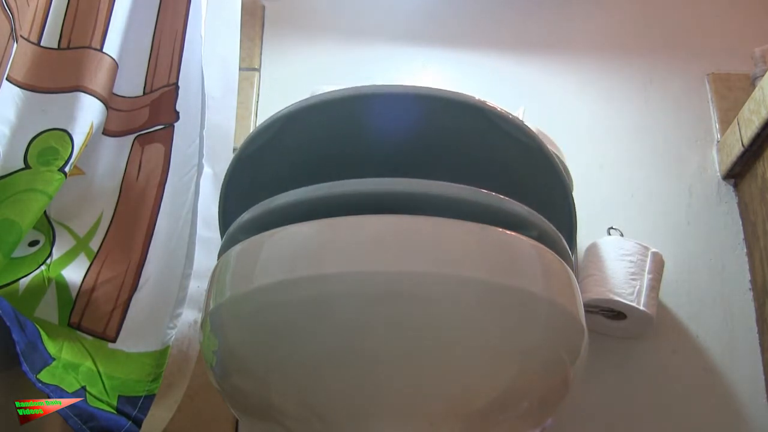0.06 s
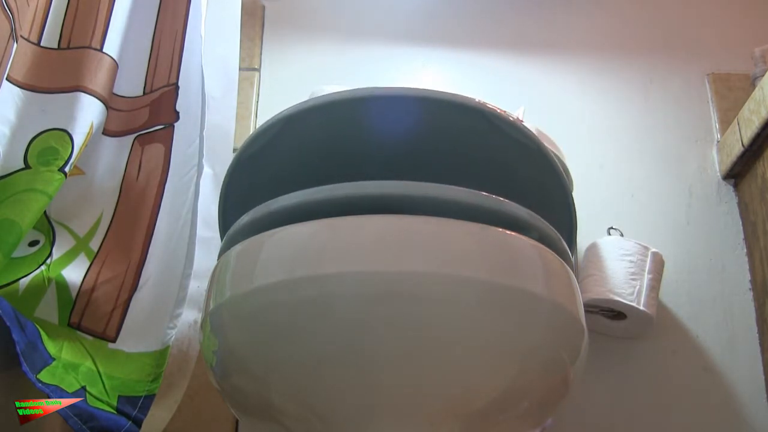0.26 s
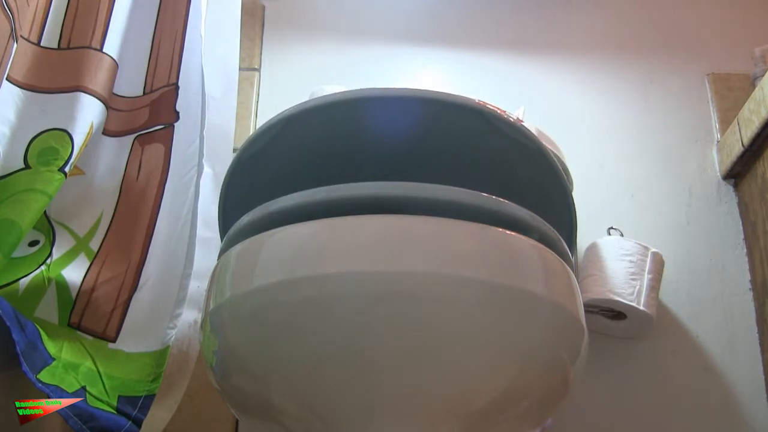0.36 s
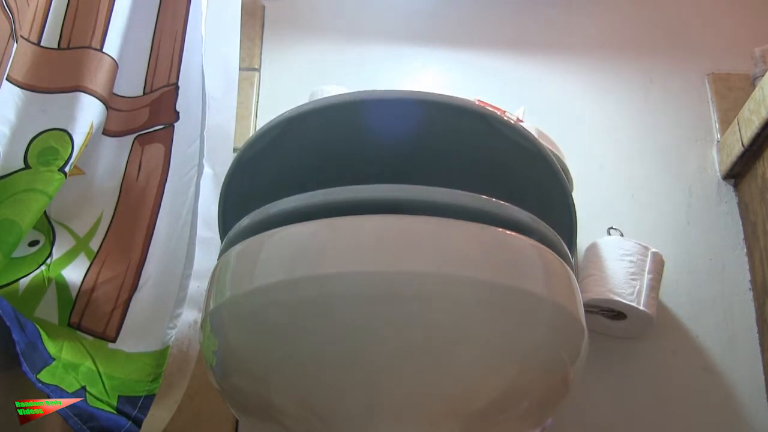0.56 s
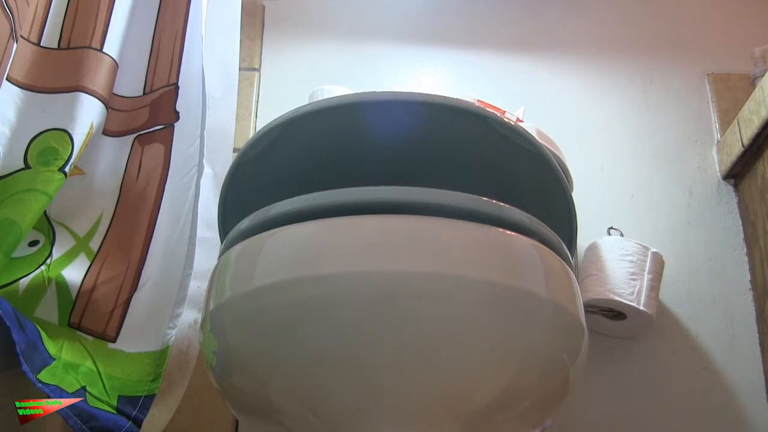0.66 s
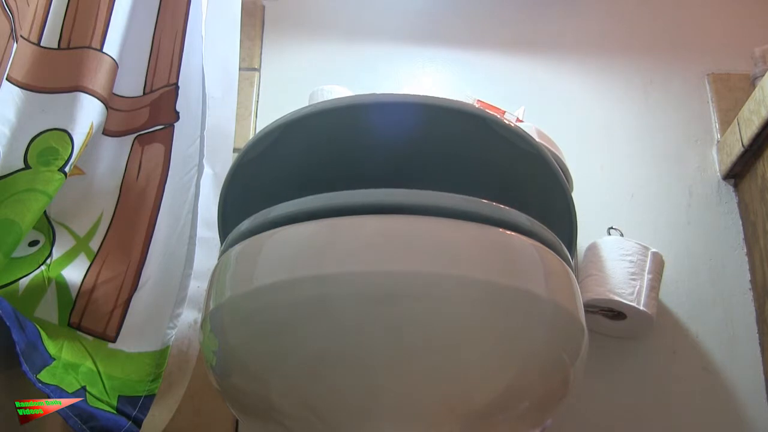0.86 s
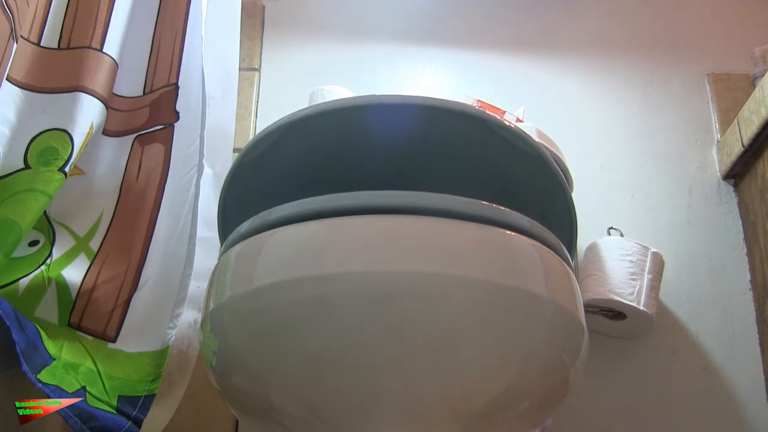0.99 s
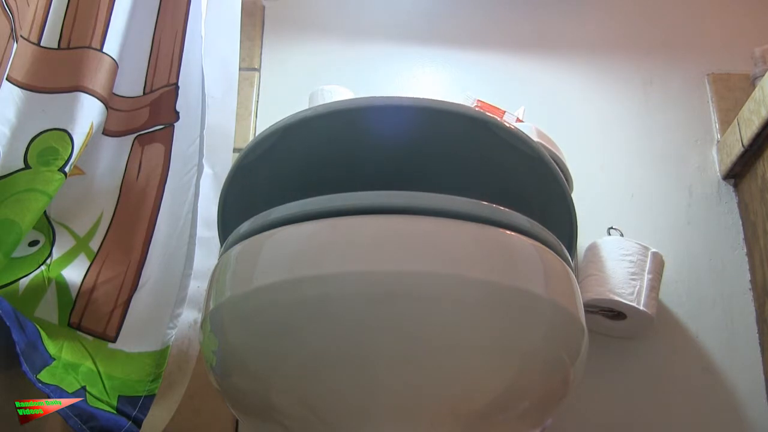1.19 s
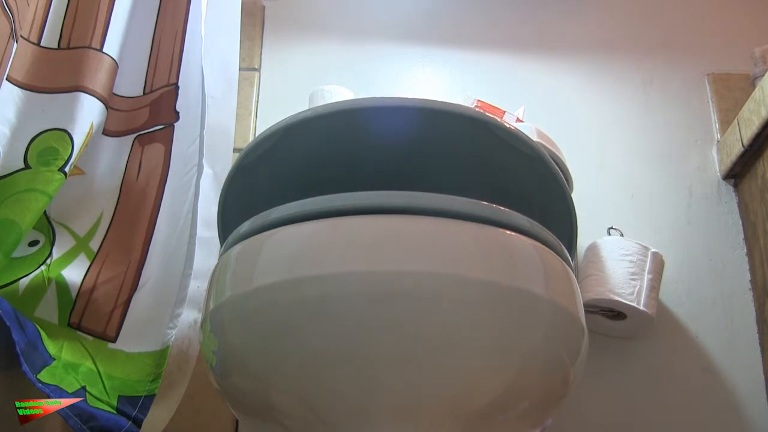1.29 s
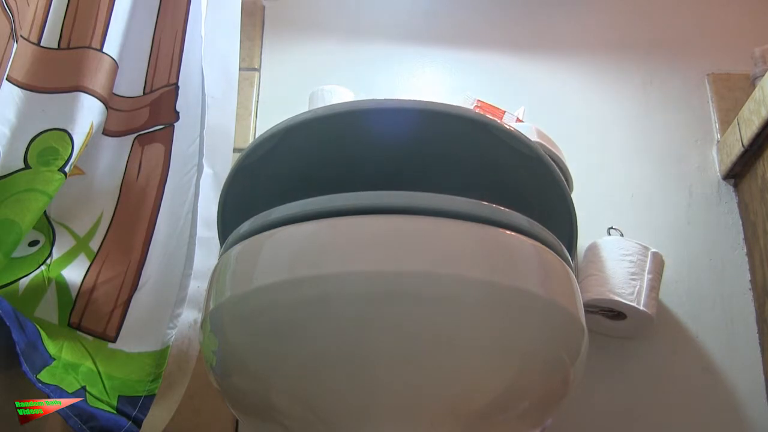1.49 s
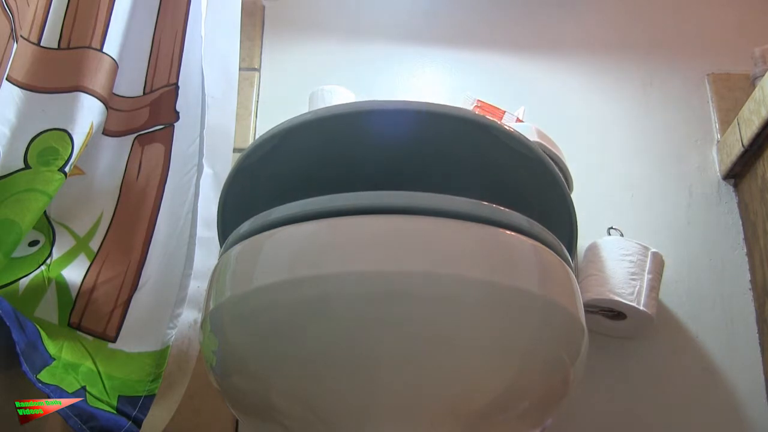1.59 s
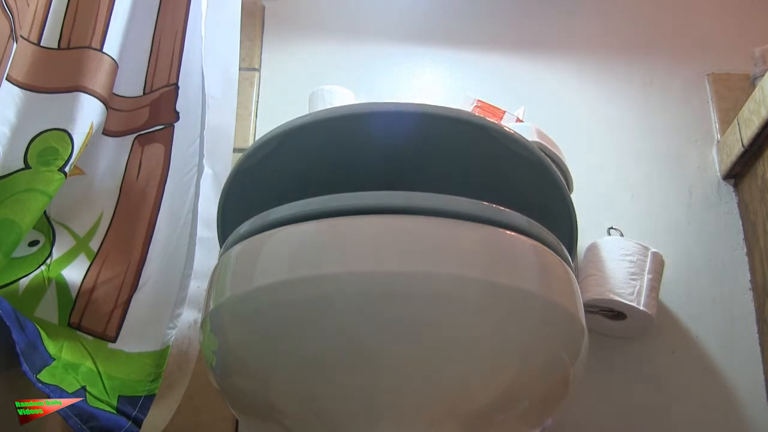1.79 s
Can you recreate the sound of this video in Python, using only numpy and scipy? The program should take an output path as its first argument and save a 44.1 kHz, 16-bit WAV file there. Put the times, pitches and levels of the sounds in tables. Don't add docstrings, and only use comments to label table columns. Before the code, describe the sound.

Toilet seat and lid knocking: one hard thud, softer rebound, thin clack, second knock, faint ticks

```python
import sys
import numpy as np
from scipy import signal
from scipy.io import wavfile

SR = 44100
rng = np.random.default_rng(int(sys.argv[2]) if len(sys.argv) > 2 else 0)


def gain_from_db(level_db):
    decades = np.asarray(level_db, float) / 20
    return 10 ** decades


def store_wav(level_fs):
    pcm = np.round(np.clip(np.atleast_2d(level_fs), -1, 1) * 32767)
    wavfile.write(sys.argv[1], SR, pcm.T.astype(np.int16))


N = 81585

# (level over the contact [dB], rise [s], share of the room decay, crack level [dB])
ROOM_SEND = [(8, 0.0028, 1.09, -0.5), (2, 0.0014, 0.99, -1.5), (-3.5, 0.00033, 1.04, -10),
             (2, 0.0009, 1.05, 5), (-5.5, 0.00095, 1.8, 0)]
REST_AT_S = [.283, .52, .85, .975, 1.9]
REST_DB = [-15, -0.5, 27.5, -1, 0]
# (frequency [Hz], left minus right [dB])
BALANCE = [(125, -1), (500, 0.5), (1000, -1), (2000, -1), (6000, -1), (12000, -0.8)]


def seat_knock(noise):
    # (time [s], level [dB], lowest reach [Hz], highest reach [Hz])
    contacts = [(.2317, -41, 700, 2200), (.2325, -17.5, 500, 1900), (.2348, -20, 700, 2580),
                (.2328, -25.5, 29.8, 500), (.2375, -30.5, 150, 700), (.2665, -39.5, 2000, 5900),
                (.2865, -51, 2500, 4450), (.2395, -28, 2000, 14300), (.2535, -28, 400, 4010),
                (.263, -27, 100, 1100), (.2795, -40.5, 1496, 12200)]
    # (frequency [Hz], level [dB], t60 [s])
    modes = [(65.4, -2.5, 0.45), (107.1, -11, 1), (138.9, 3, 0.39), (208.8, 3, 0.33), (255.2, -4, 0.83),
             (396.9, -13.5, 0.72), (470, -1.5, 0.077), (686, -7.5, 0.081), (937, -2, 0.046),
             (1037, -0.5, 0.07), (1150, -0.5, 0.032), (1333, 6.5, 0.019), (2090, -5, 0.028),
             (3528, -13.5, 0.14)]
    # (frequency [Hz], density [dB per Hz])
    colour = [(88, -24), (150, -0.5), (315, -52), (390, -14.5), (635, -10), (1850, -32.5), (3670, -29),
              (12300, -33.5), (15800, -59)]
    return blow(noise, contacts, modes, colour, 0)


def lid_knock(noise):
    # (time [s], level [dB], lowest reach [Hz], highest reach [Hz])
    contacts = [(.9313, -29.5, 595, 2240), (.9325, -26.5, 252, 2020), (.9335, -35.5, 1200, 8500),
                (.9368, -20, 625, 2440), (.9325, -28, 30.2, 600), (.9422, -36, 8000, 12000),
                (.9442, -32, 4000, 10100), (.9555, -40, 4000, 12000), (.9495, -29, 303, 2040),
                (.977, -37, 60, 1400), (1.0045, -35.5, 80.4, 1200)]
    # (frequency [Hz], level [dB], t60 [s])
    modes = [(69.6, 2.5, 0.46), (120.7, -6, 0.68), (150, 6, 0.071), (206.4, -19, 0.46), (254, -17, 0.69),
             (386, -1, 0.1), (506.6, -6, 0.26), (800, -14, 0.081), (1075, 3, 0.05), (1210, -23.5, 0.15),
             (1464, 5, 0.025), (1900, -3.5, 0.037), (8620, 2.5, 0.018), (11400, 1, 0.024)]
    # (frequency [Hz], density [dB per Hz])
    colour = [(88, -6.5), (150, 0), (447, -18), (512, -9), (576, -14.5), (1310, -14.5), (2170, -27),
              (8650, -19), (15800, -30.5)]
    return blow(noise, contacts, modes, colour, 3)


def dull_rebound(noise):
    # (time [s], level [dB], lowest reach [Hz], highest reach [Hz])
    contacts = [(.4437, -35.5, 690, 1700), (.4460, -36, 1150, 1900), (.4445, -29.5, 33, 580),
                (.4555, -35, 120, 560), (.4495, -40.5, 1800, 7700), (.4545, -40, 1000, 7700),
                (.4608, -35, 2050, 15000), (.4655, -49, 2500, 5700), (0.39, -55, 2000, 6000),
                (.484, -44, 1800, 5100), (.462, -32.5, 26, 720), (0.42, -69, 100, 1980)]
    # (frequency [Hz], level [dB], t60 [s])
    modes = [(69.7, 1, 0.45), (117.6, 1.5, 0.27), (146.1, -1, 0.51), (187.6, -15.5, 0.19),
             (252.6, -18.5, 0.4), (396, -15.5, 0.34), (486, -15.5, 0.17), (926, -8, 0.094),
             (1500, 1, 0.035), (1830, 3.5, 0.022), (3300, -5.5, 0.038), (3920, -12, 0.066),
             (8300, -15.5, 0.07)]
    # (frequency [Hz], density [dB per Hz])
    colour = [(88, -5), (150, -6), (309, -13), (405, -10.5), (742, -18), (937, -16), (2580, -19),
              (4120, -15.5), (15800, -41)]
    return blow(noise, contacts, modes, colour, 1)


def thin_clack(noise):
    # (time [s], level [dB], lowest reach [Hz], highest reach [Hz])
    contacts = [
        (.7522, -38, 860, 8900),
        (.7545, -35.5, 910, 6500),
        (.7540, -39.5, 30.8, 406),
        (.7645, -45, 1500, 6900),
        (.782, -51, 1220, 3000),
        (.819, -54.5, 1020, 2470),
    ]
    # (frequency [Hz], level [dB], t60 [s])
    modes = [(69, 4.5, 0.44), (81, 4, .12), (130, -14.5, 0.48), (1134, -6.5, 0.074), (1670, 2, 0.032),
             (2115, -4, 0.066), (2680, -9, 0.023), (2910, -0.5, 0.028), (3560, -3, 0.04),
             (4660, -13.5, 0.04), (5670, -2, 0.019), (6500, -17, 0.022), (9020, 1.5, 0.013),
             (12600, -5, .02)]
    # (frequency [Hz], density [dB per Hz])
    colour = [(88, -14), (150, -6.5), (565, -16.5), (622, -29), (1680, -8), (2680, -7.5), (3600, -12),
              (11100, -19), (15800, -57)]
    return blow(noise, contacts, modes, colour, 2)


def faint_ticks(noise):
    # (time [s], level [dB], lowest reach [Hz], highest reach [Hz])
    contacts = [(.6872, -52.5, 1200, 8100), (.6915, -60, 1010, 6000), (1.4130, -42.5, 6500, 15000),
                (1.419, -54, 40.2, 3000), (.69, -50, 200, 453), (.875, -54.5, 39.9, 400),
                (1.715, -59, 61.7, 199), (1.4195, -49.5, 1000, 2800), (1.433, -54, 1200, 5000),
                (1.468, -55, 600, 2540), (1.583, -63.5, 1500, 4000), (1.60, -49.5, 200, 500),
                (1.6113, -60.5, 1470, 5000), (1.781, -57, 1200, 4500), (1.799, -66, 197, 1000),
                (1.807, -48, 150, 980), (1.817, -63, 500, 990), (1.831, -48, 3000, 5000),
                (1.8395, -46, 800, 2500), (1.8455, -48, 1000, 2500)]
    # (frequency [Hz], level [dB], t60 [s])
    modes = [(74, -3, 0.26), (144, -3, 0.15), (303, -4, 0.059), (700, -2, 0.031), (1100, -10.5, 0.044),
             (1539, 4, 0.022), (2200, -4.5, 0.018), (2680, -6, 0.022), (3820, -3.5, 0.014),
             (4500, -2, 0.018), (5500, -2, 0.0096)]
    # (frequency [Hz], density [dB per Hz])
    colour = [(88, -12), (150, -38), (438, -10.5), (1620, -7.5), (3080, -47), (3890, -20), (15800, -28)]
    return blow(noise, contacts, modes, colour, 4)


def blow(noise, contacts, modes, colour, which):
    body = ringing(contacts, modes, REST_AT_S[which], REST_DB[which])
    return body + wash(noise, contacts, colour, *ROOM_SEND[which])


def ringing(contacts, modes, rest_at_s, rest_db):
    strength_spread_db, mode_pan_db = 1.5, 1
    twin_share, twin_detune = 0.28, 0.1
    rise_cycles, rest_time_s = 0.4, 0.011
    out = np.zeros((2, N + SR))
    t = np.arange(SR // 2) / SR
    luck = rng.standard_normal((len(contacts), 16))
    pans = rng.standard_normal(16)
    offsets = rng.uniform(-1, 1, 16)
    for (start_s, db, low_hz, high_hz), chances in zip(contacts, luck):
        start = int(start_s * SR)
        settling_db = rest_db * np.clip((t + start_s - rest_at_s) / rest_time_s, 0, 1) * (start_s < rest_at_s)
        for (hz, mode_db, t60), chance, pan, offset in zip(modes, chances, pans, offsets):
            twin_hz = hz * (1 + twin_detune * np.sign(offset) * (1 + abs(offset)) / 2)
            tone = np.sin(2 * np.pi * hz * t) + twin_share * np.sin(2 * np.pi * twin_hz * t)
            tone *= fading(t, rise_cycles / hz, t60) * reach(hz, low_hz, high_hz)
            tone *= gain_from_db(settling_db * reach(hz, 113, 500))
            pan_db = mode_pan_db * pan * min(0.096 + hz / 500, 1)
            sides_db = (at_hz(BALANCE, hz) + pan_db) * np.array([[.5], [-.5]])
            level_db = db + mode_db + 7.5 + strength_spread_db * chance + sides_db
            out[:, start:start + len(t)] += gain_from_db(level_db) * tone
    return out[:, :N]


def wash(noise, contacts, colour, level_db, rise_s, decay_share, crack_db):
    # (frequency [Hz], t60 [s])
    room_t60 = [(150, 0.55), (420, 0.3), (1100, 0.3), (2900, 0.2), (7700, 0.21), (14000, 0.17)]
    crack_t60_s, crack_tilt_db = 0.01, 0.6
    out = np.zeros((2, N))
    t = np.arange(SR // 2) / SR
    for hz, band in noise:
        tail = fading(t, rise_s + 1 / hz, decay_share * at_hz(room_t60, hz))
        tail = tail * gain_from_db(at_hz(colour, hz) + level_db + 19.5)
        crack = fading(t, 1 / hz, crack_t60_s) * (hz > 800)
        crack = crack * gain_from_db(crack_db + crack_tilt_db * np.log2(hz / 2000))
        shape = tail ** 2 + crack ** 2
        power = np.zeros(N + SR)
        for start_s, db, low_hz, high_hz in contacts:
            start = int(start_s * SR)
            force = gain_from_db(db) * reach(hz, low_hz, 2 * high_hz)
            power[start:start + len(t)] += shape * force ** 2
        out += band * np.sqrt(power[:N])
    return out


def reach(hz, low_hz, high_hz):
    return 1 / np.sqrt(1 + (hz / high_hz) ** 6) / (1 + (low_hz / hz) ** 2)


def fading(t, rise_s, t60):
    swell = (1 - np.exp(-t / max(rise_s, 1e-4))) ** 2
    return swell * gain_from_db(-60 * t / max(t60, .005))


def room_tone():
    # (frequency [Hz], density [dB per Hz])
    air = [(30, 7.5), (50, -10), (70, -1), (160, -3), (320, -6.5), (1200, -15.5), (4500, -19.5),
           (15500, -30.5)]
    # (time [s], level [dB])
    stir = [(0, 1.5), (.1, 2), (.22, -2), (.55, -2), (.67, -1.5), (.72, -0.5), (1.15, 1.5), (1.4, -1),
            (1.55, -1), (1.76, -1.5), (1.81, 4), (1.85, 0.5)]
    # (time [s], level [dB])
    rumble = [
        (0, 4.5),
        (.07, 5),
        (.15, 3),
        (.23, 0),
        (.8, 5),
        (.9, 10.5),
        (1.1, 7),
        (1.3, 2),
        (1.85, -3),
    ]
    air_db, patchy_db, rumble_hz = -62, 0.8, 166
    t = np.arange(N) / SR
    stir_db = np.interp(t, *np.transpose(stir))
    rumble_db = np.interp(t, *np.transpose(rumble))
    out = np.zeros((2, N))
    for hz, band in bands():
        low_share = np.exp(-3.0 * np.log2(hz / rumble_hz) ** 2)
        moving_db = low_share * rumble_db + (1 - low_share) * stir_db
        out += band * gain_from_db(at_hz(air, hz) + patchy_db * drift(16.1) + moving_db)
    return gain_from_db(air_db + 24.5) * out


def bands():
    # (frequency [Hz], correlation)
    likeness = [(60, 1), (250, 0.96), (600, 0.62), (1200, 0.92), (2500, 0.68), (8000, 0.75), (13000, 0.6)]
    edges = 28 * 2 ** np.arange(0, 9.4, 1 / 3)
    white = rng.standard_normal((2, 2, N + SR // 10))
    out = []
    for k, (low, high) in enumerate(zip(edges, edges[1:])):
        band_pass = signal.butter(2, [low, high], "band", fs=SR, output="sos")
        mid, side = signal.sosfilt(band_pass, white[k % 2])[:, -N:]
        hz = np.sqrt(low * high)
        alike = np.clip(at_hz(likeness, hz), 0, 1)
        pair = np.sqrt(1 + alike) * mid + np.sqrt(1 - alike) * side * [[1], [-1]]
        out.append((hz, pair * gain_from_db(at_hz(BALANCE, hz) * np.array([[.5], [-.5]]))))
    return out


def drift(rate_hz):
    r = np.exp(-80 * np.pi * rate_hz / SR)
    white = rng.standard_normal(N // 40 + 2002)
    slow = signal.lfilter([1], [1, -2 * r, r * r], white)[2000:]
    return np.interp(np.arange(N) / 40, np.arange(len(slow)), slow / slow.std())


def at_hz(points, hz):
    table_hz, values = np.transpose(points)
    return np.interp(np.log(hz), np.log(table_hz), values)


def scene():
    noise = bands()
    knocks = seat_knock(noise) + lid_knock(noise)
    small_sounds = dull_rebound(noise) + thin_clack(noise) + faint_ticks(noise)
    return knocks + small_sounds + room_tone()


def band_limit(x):
    return signal.sosfilt(signal.butter(12, 15970, fs=SR, output="sos"), x)


def record(dry):
    bass_cut = signal.butter(2, 67, "high", fs=SR, output="sos")
    top_cut = signal.cheby2(14, 70, 16050, fs=SR, output="sos")
    mix = signal.sosfilt(top_cut, signal.sosfilt(bass_cut, dry))
    return band_limit(mix)


dry = scene()
out = record(dry)
store_wav(out)
```